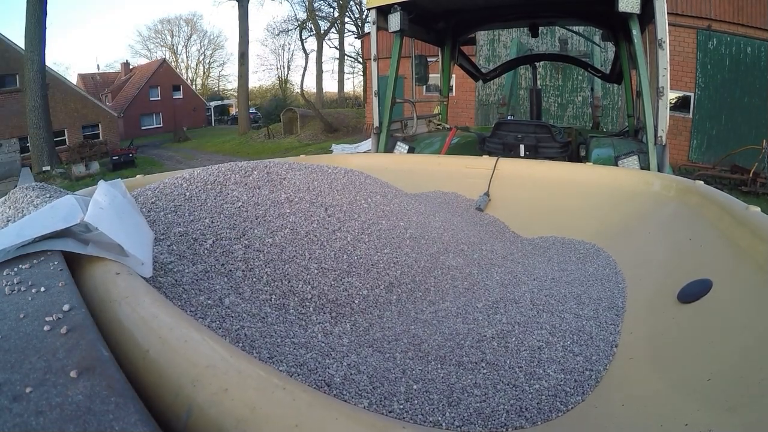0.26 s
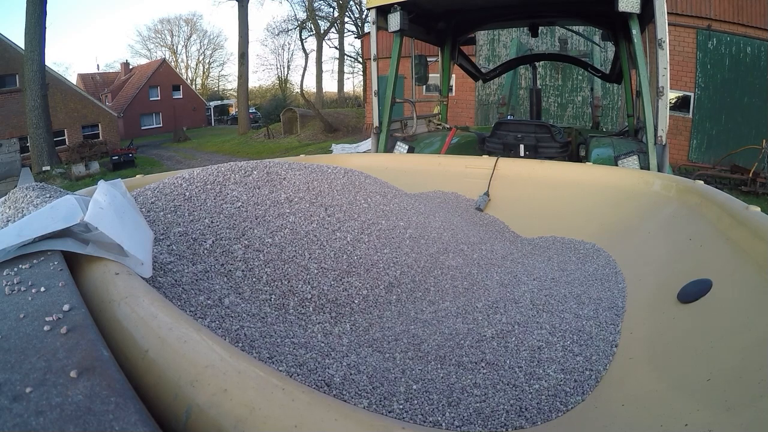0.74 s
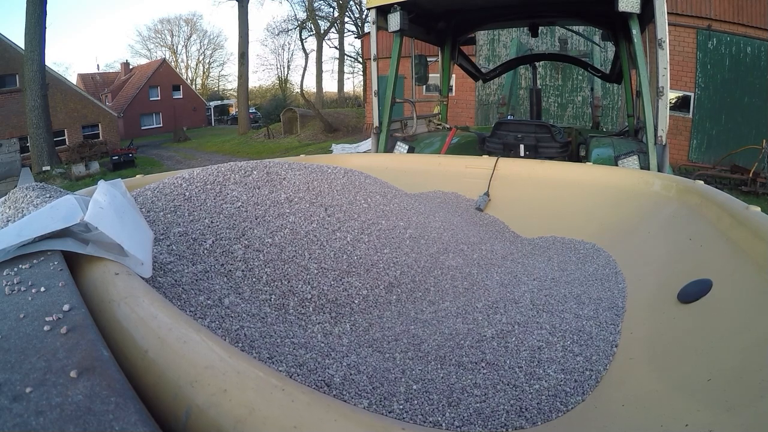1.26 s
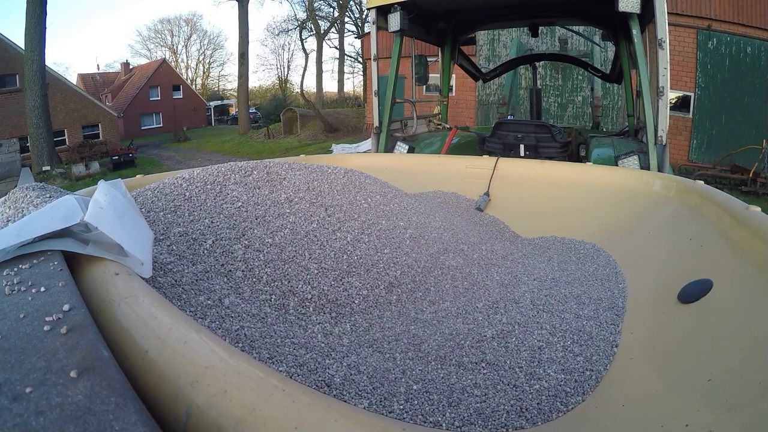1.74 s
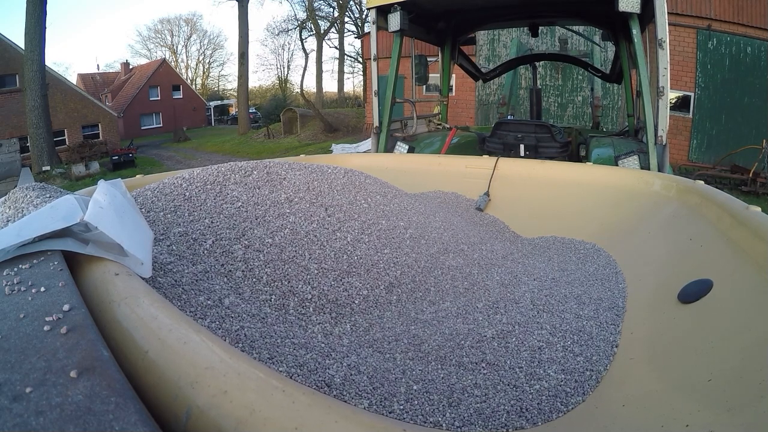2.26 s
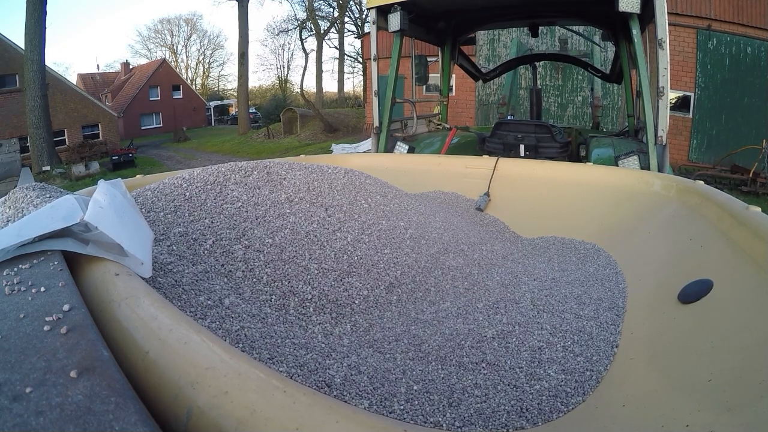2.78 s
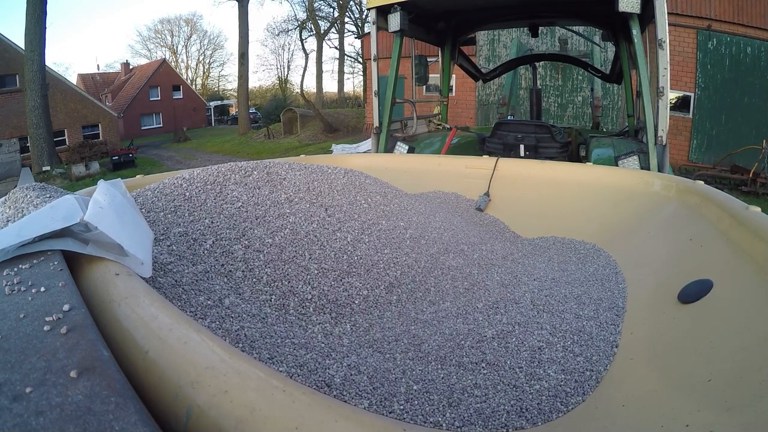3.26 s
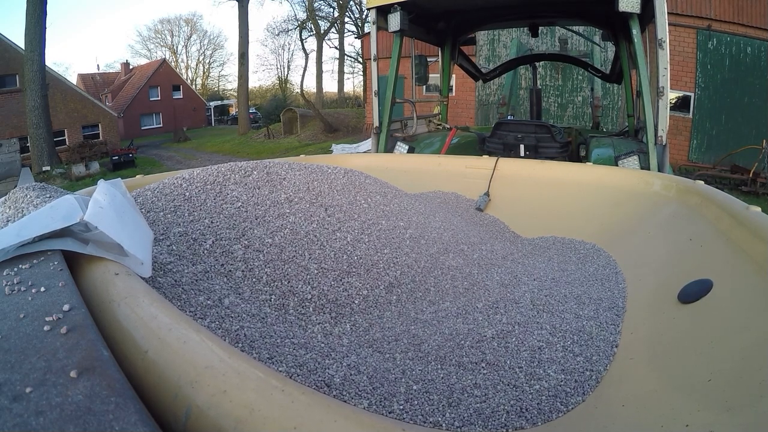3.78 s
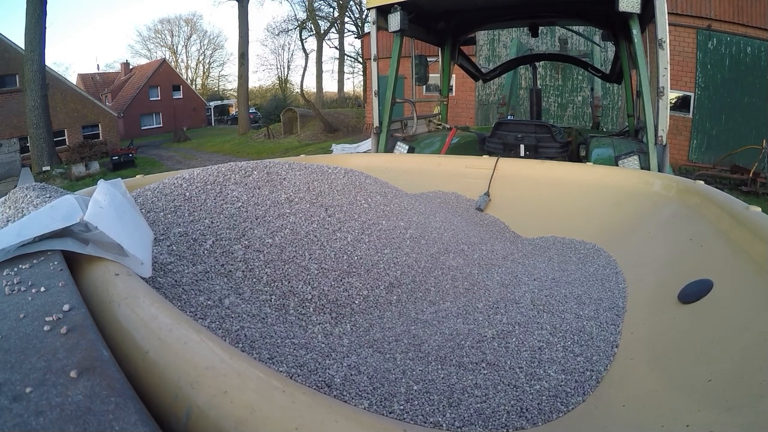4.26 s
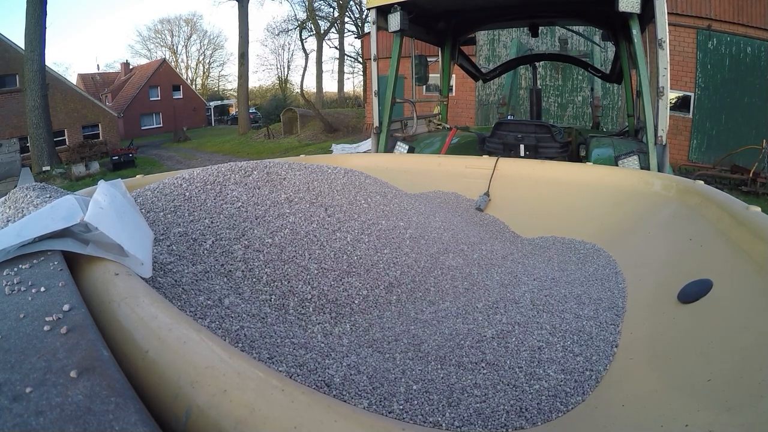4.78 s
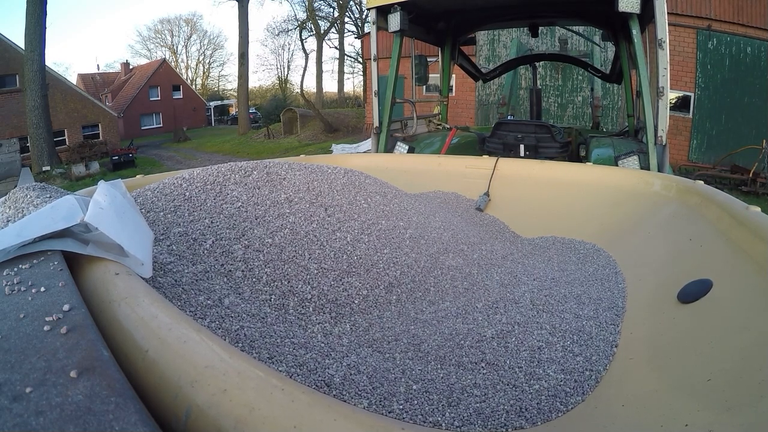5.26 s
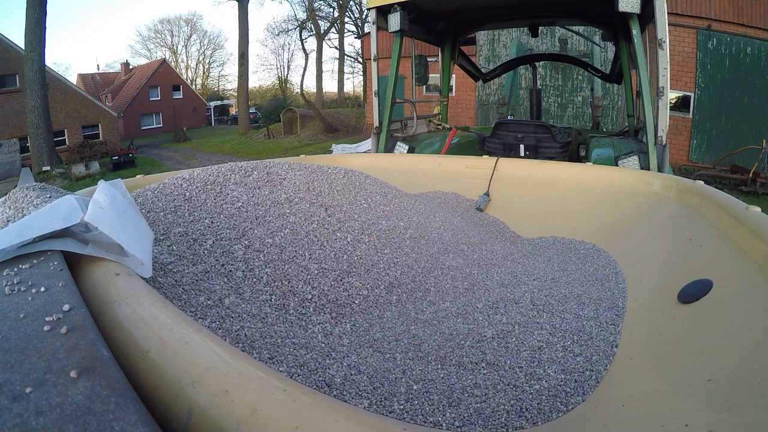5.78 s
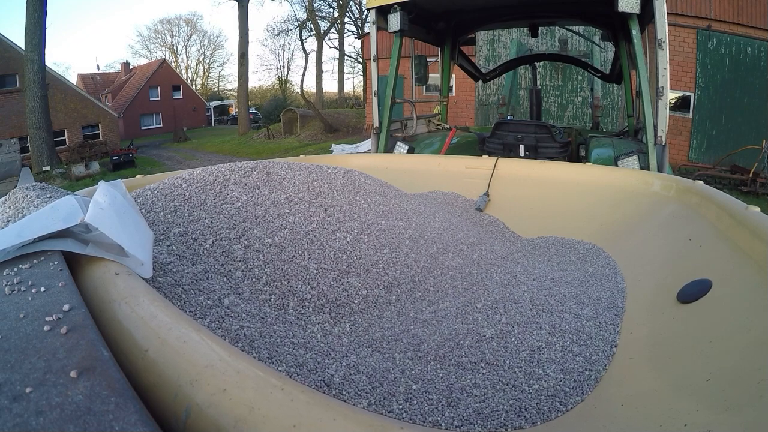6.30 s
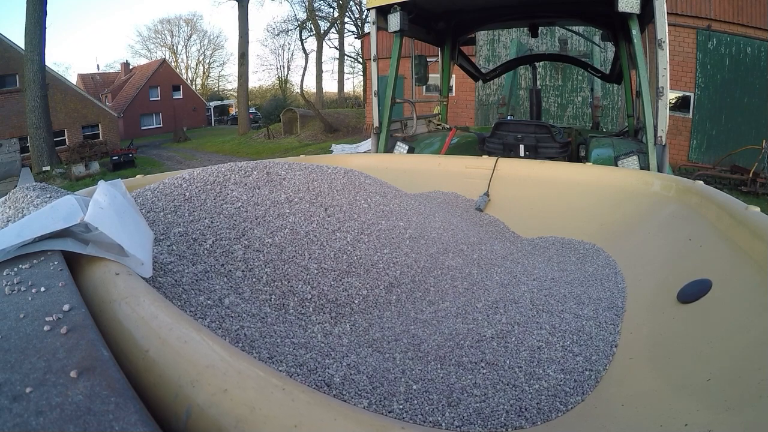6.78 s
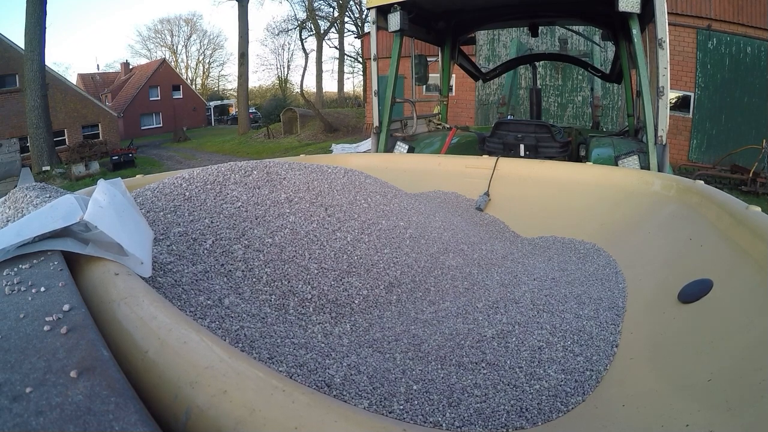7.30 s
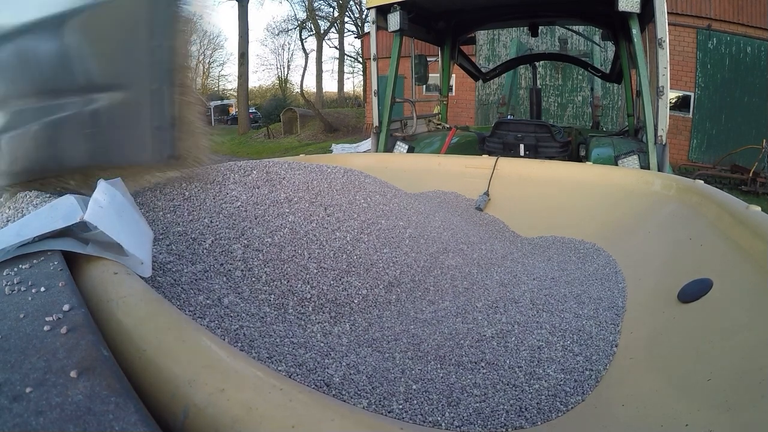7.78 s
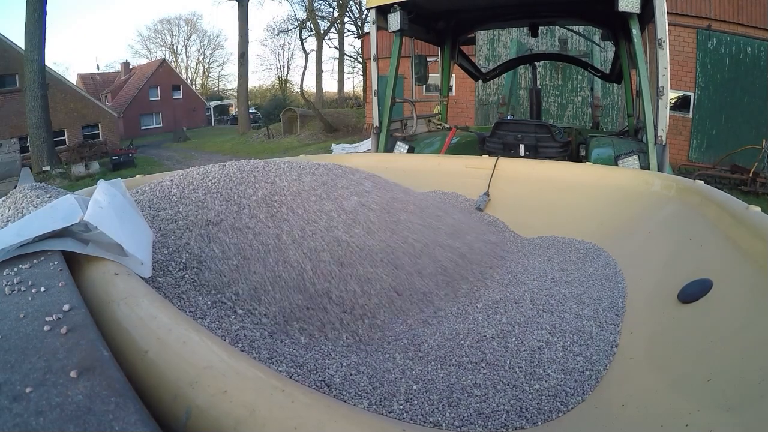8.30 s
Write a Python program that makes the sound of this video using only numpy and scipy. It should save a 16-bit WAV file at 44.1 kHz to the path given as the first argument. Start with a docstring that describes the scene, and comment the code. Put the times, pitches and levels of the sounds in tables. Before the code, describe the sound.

A steel shovel knocks, scrapes and crunches repeatedly into hard granules in a quiet farmyard, then a load is thrown hissing into a plastic hopper.

```python
"""A steel blade knocks on a farmyard floor, then scrapes and crunches into a heap of hard granules.
It rings when lifted free; dull low thuds fall, granules slide and tick, birds whistle, and at last a load
is thrown into a plastic hopper. Random contacts through filters and resonances make the granules and steel;
decaying sines make thumps, clacks and ticks; gliding sines make the birds; coloured noise makes the yard."""
import sys
import numpy as np
from scipy import signal
from scipy.fft import rfft, irfft
from scipy.io import wavfile

SR = 44100
rng = np.random.default_rng(int(sys.argv[2]) if len(sys.argv) > 2 else 0)


def transcribe(u):
    """Save the signal u as a 16-bit wav file named by the first command-line argument.

    u: samples, shape (n,) or (channels, n), limited to [-1, 1]; the rate is SR.
    q: integer samples, one column per channel.
    """
    v = np.clip(np.atleast_2d(u).T, -1, 1)
    q = np.round(v * 32767).astype(np.int16)
    wavfile.write(sys.argv[1], SR, q)


def amplitude_ratio(level_db):
    """Convert a level in decibels to the matching linear amplitude (field) ratio."""
    exponent = np.asarray(level_db, float) / 20
    return 10 ** exponent


N = 377010

# Colour of granules crushed under the edge. Each row: frequency in Hz, density in dB per Hz.
CRUSH_SPECTRUM = [(18, -106), (30, -1), (48, -5), (144, 0), (454, -8.5), (491, -6.5), (708, -7.5),
                  (969, -6.5), (1160, -7.5), (2680, -13.5), (3770, -18), (4890, -17.5), (15400, -38)]
# Broad resonances of the loaded blade. Each row: frequency in Hz, width in Hz, gain in dB.
LOADED_BLADE = [(55.5, 1.9, 16.5), (142.2, 32.4, 6.5), (229, 23.7, 2), (300.2, 16, 9), (420.3, 22.6, 4.5),
                (676, 28.5, 6.5), (777, 50, -10), (975.5, 38, 9.5), (1276, 135, -8), (1526, 80, 5),
                (1794, 220, -12.5), (2283, 127, 6), (2650, 96, -6), (2860, 53, 7), (3396, 125, -2.5),
                (4018, 65, 9), (4810, 52, -5), (5885, 85, 7.5), (7220, 39, 0)]


def shovel():
    """Granules crushed under the edge shake the loaded blade and the floor; the free blade rings on."""
    contacts = colour(granules(9000, spread_db=2.5, clumps_db=1.49), CRUSH_SPECTRUM)
    # alternating polarity of the modes
    rings = [(-1) ** k * amplitude_ratio(db) * resonance(contacts, hz, width_hz)
             for k, (hz, width_hz, db) in enumerate(LOADED_BLADE)]
    sound = strokes(contacts, rings) + knocks_and_thuds(contacts, rings) + slides() + clacks()
    return sound + free_blade(sound)


def strokes(contacts, rings):
    """Pushing through the heap excites crunch, hiss, rumble and the hollow of the filling scoop."""
    # the load shifts, so each resonance comes and goes
    body = sum(ring * drift(12, 4.0) for ring in rings)
    hollow = rms_one(resonance(contacts, hz=1000, width_hz=120))
    layers = [*three_bands(contacts + amplitude_ratio(-2) * body), hollow]
    pushed = np.sum(stroke_gains() * layers, axis=0)
    # the heap swallows some of the very top
    return signal.sosfilt(signal.butter(1, 12000, fs=SR, output="sos"), pushed)


# Pushes through the heap, one table a stroke, the last for the load being carried.
# Each row: time in seconds, crunch level in dB.
STROKES = [
    [(.128, -81), (.152, -35.5), (.248, -25), (.28, -23), (.326, -25), (.394, -22.5), (.47, -47.5),
     (.55, -52)],
    [(1.162, -58), (1.268, -50), (1.45, -28.5), (1.554, -18), (1.606, -23.5), (1.66, -21.5), (1.712, -26.5),
     (1.78, -59)],
    [(2.26, -66), (2.376, -47), (2.526, -35.5), (2.6, -33.5), (2.738, -18.5), (2.854, -16.5),
     (2.972, -25.5), (3.022, -50.5), (3.19, -52.5), (3.42, -47)],
    [(4.06, -57), (4.16, -47.5), (4.22, -56), (4.31, -65), (4.345, -19.5), (4.41, -15.5), (4.472, -10),
     (4.534, -23.5), (4.628, -48), (4.78, -55)],
    [(5.0, -70), (5.048, -35), (5.158, -16), (5.18, -28), (5.212, -12), (5.322, -27), (5.418, -55),
     (5.52, -60)],
    [(5.8, -55), (5.87, -35.5), (5.917, -18), (5.997, -18), (6.05, -20.5), (6.107, -25.5), (6.153, -40.5),
     (6.27, -57.5)],
    [(6.5, -58.5), (6.69, -52), (7.1, -57.5), (7.59, -58.5)],
]
# Colour of each stroke. Each row: granule hiss in dB, floor rumble in dB (both over the followed crunch),
# hiss fade in dB per second, hollow ring in dB over the crunch.
STROKE_COLOUR = [(-7.5, -14.5, 151, -11), (-9, -14.5, 155, -12), (-9, -11.5, 174, -11.5),
                 (-10.5, -9.5, 132, -19), (-7, -8, 183, -8), (-8, -8.5, 250, -1), (-7, -8, 150, -17)]
# The heap rustling between strokes. One row: crunch, hiss, rumble and hollow ring levels in dB.
REST = (-61, -66, -59, -75)
HISS_FOLLOWS, RUMBLE_FOLLOWS = 0.92, 0.88  # share of the crunch's swing in dB
RUMBLE_FADES_DB_PER_S, RUMBLE_LAG_S = 166, 0.016  # the floor takes the weight late and shakes on


def stroke_gains():
    """Crunch follows the push; hiss and rumble follow the crunch but fall at a limited rate."""
    t = np.arange(0, N, 16) / SR
    layers = np.repeat(np.array(REST, float)[:, None], len(t), axis=1)
    for rows, (hiss_db, rumble_db, hiss_fades, hollow_db) in zip(STROKES, STROKE_COLOUR):
        push, late = [np.interp(t - lag, *np.transpose(rows), -140, -140) for lag in (0, RUMBLE_LAG_S)]
        hiss = fall_slowly(hiss_db + HISS_FOLLOWS * push, hiss_fades, t)
        rumble = fall_slowly(rumble_db + RUMBLE_FOLLOWS * late, RUMBLE_FADES_DB_PER_S, t)
        layers = np.maximum(layers, [push, hiss, rumble, push + hollow_db])
    return np.array([np.interp(np.arange(N) / SR, t, amplitude_ratio(db)) for db in layers])


def fall_slowly(db, fade_db_per_s, t):
    """Follows rises at once, falls no faster than the fade."""
    return np.maximum.accumulate(db + fade_db_per_s * t) - fade_db_per_s * t


def knocks_and_thuds(contacts, rings):
    """A blow on the floor clatters mostly in the steel's resonances, with little top, and thumps."""
    struck = amplitude_ratio(-4) * contacts + sum(ring * drift(8, 2.0) for ring in rings)
    struck = signal.sosfilt(signal.butter(1, 7000, fs=SR, output="sos"), struck)
    envelopes, thumps = blows(rise_s=[.003, .002, .006], linger=[1.0, .9, 1.8], bend=1.19)
    return np.sum(envelopes * three_bands(struck), axis=0) + thumps


# Knocks of the blade. Each row: start in seconds, crunch in dB, hiss in dB, thump in dB,
# base decay in seconds per 60 dB.
KNOCKS = [(0.029, -37, -43, -52, 0.025), (.079, -18, -43, -18, .05), (.086, -15.5, -24, -13.5, 0.12),
          (0.16, -9.5, -16.5, -10, 0.067), (.243, -17.5, -30, -44, 0.11), (0.357, -23, -27, -48, 0.092),
          (0.615, -41.5, -73, -28.5, 0.062), (0.753, -35.5, -47, -22, 0.037),
          (0.96, -8.5, -22.5, -1.5, 0.088), (1.04, -34.5, -46, -20.5, 0.11),
          (1.145, -32.5, -71, -23.5, 0.11), (1.206, -23.5, -35, -19, 0.37),
          (1.269, -20.5, -24.5, -17, 0.036), (1.328, -24, -34.5, -12, 0.23), (1.355, -16, -41, -19, 0.022),
          (1.394, -17.5, -25, -45, 0.11), (1.652, -19, -37, -32, 0.092), (1.69, -19, -21, -3, 0.034),
          (2.207, -20, -33.5, -15, 0.12), (2.233, -35, -31, -27, 0.048), (2.314, -33, -39.5, -37, 0.21),
          (2.5, -29, -63, -35, 0.047), (2.546, -17.5, -27.5, -9.5, 0.056), (2.743, -32, -39, -40, 0.025),
          (2.848, -30.5, -44, -8, 0.22), (3.201, -44, -55, -65, 0.23), (3.391, -33.5, -39, -30, 0.034),
          (4.146, -23, -52, -39, .035), (4.219, -10, -29, -8.5, 0.075), (4.299, -29.5, -38.5, -22, 0.11),
          (4.347, -20, -31, -3.5, 0.13), (4.994, -2.5, -14, -0.5, 0.053), (5.08, -15.5, -24.5, -13, 0.28),
          (5.117, -16, -23, -31, 0.024), (5.17, -10.5, -23, -11, 0.079), (5.747, -11.5, -17.5, -16.5, .14),
          (5.806, -30.5, -44, -18, 0.11), (5.828, -15.5, -21.5, -32, 0.16), (6.09, -30.5, -56, -11, .1)]
# Dull low thuds: footsteps, and deep thumps during the strokes. Each row: start in seconds, thump in dB,
# settled thump pitch in Hz, base decay in seconds per 60 dB.
THUDS = [(0.695, -23, 254, 0.24), (1.358, -22, 131, .05), (2.249, -35, 255, .1), (2.318, -27, 247, 0.12),
         (3.153, -25, 76.7, .056), (4.429, -1.5, 140, 0.06), (5.118, 0.5, 146, 0.048),
         (6.829, -21, 60, 0.041), (6.925, -23, 44, 0.065), (7.263, -26.5, 106, 0.087),
         (7.291, -15.5, 134, 0.035), (7.39, -18, 69.7, 0.043)]
THUD_CRUNCH_DB, THUD_HISS_DB = -27, -40  # relative to the thump
THUMP_TOP_HZ, HARD_DB, PITCH_FOLLOWS = 284, -20, 0.536  # knocks softer than HARD_DB thump lower


def blows(rise_s, linger, bend):
    """Crunch, hiss and rumble envelopes of knocks and thuds, and the sagging low thump under each."""
    envelopes, thumps = np.zeros((3, N)), np.zeros(N)
    t = np.arange(SR // 3) / SR
    blade = [(*row, THUMP_TOP_HZ * amplitude_ratio(PITCH_FOLLOWS * min(row[1] - HARD_DB, 0))) for row in KNOCKS]
    thuds = [(s, db + THUD_CRUNCH_DB, db + THUD_HISS_DB, db, t60, hz) for s, db, hz, t60 in THUDS]
    for s, crunch_db, hiss_db, low_db, t60, hz in blade + thuds:
        at = slice(round(s * SR), round(s * SR) + len(t))
        levels_db = [crunch_db, hiss_db, low_db - 9.5]
        for layer, db, rise, longer in zip(envelopes, levels_db, rise_s, linger):
            # bend above 1: the sound holds for a moment before it dies
            decay = amplitude_ratio(db - 60 * (t / (t60 * longer)) ** bend)
            layer[at] += decay * (1 - np.exp(-t / rise))
        # a few cycles, sagging in pitch
        cycles = hz * t * (1 + 0.14 * np.exp(-t / 0.021))
        decay = amplitude_ratio(low_db - 60 * t / max(9.5 / hz, 0.64 * t60))
        thumps[at] += decay * np.sin(2 * np.pi * cycles) * (1 - np.exp(-t / 0.0089))
    return envelopes, thumps


# Colour of sliding granules. Each row: frequency in Hz, density in dB per Hz.
SLIDE_SPECTRUM = [(88, -14), (150, -8.5), (225, -3.5), (499, -12), (681, -2.5), (736, -6.5), (1510, -4.5),
                  (4050, -3), (15400, -22)]


def slides():
    """Granules sliding off the lifted blade: dense small contacts."""
    return slide_gain() * rms_one(colour(granules(12000, spread_db=3.0, clumps_db=0.4), SLIDE_SPECTRUM))


# Slides off the blade. Each row: start in seconds, rise in seconds, hold in seconds, fall in seconds,
# level in dB.
SLIDES = [(1.725, 0.038, 0.14, 0.1, -44.5), (3.376, 0.19, 0.13, .11, -36.5),
          (6.294, 0.074, 0.042, 0.077, -33.5)]
SLIDE_RISE_DB, SLIDE_FALL_DB, SLIDE_EDGE_S = 16, 22.5, 0.059


def slide_gain():
    """Each slide swells, holds and runs out."""
    tables = []
    for s, rise, hold, fall, db in SLIDES:
        full, falling, end = s + rise, s + rise + hold, s + rise + hold + fall
        tables.append([(s - SLIDE_EDGE_S, -80), (s, db - SLIDE_RISE_DB), (full, db), (falling, db),
                       (end, db - SLIDE_FALL_DB), (end + SLIDE_EDGE_S, -80)])
    return in_spans(tables)[0]


# The bare edge on stone. Each row: start in seconds, level in dB.
CLACKS = [(4.996, -27), (5.751, -11.5), (5.832, -26)]
# Modes of the edge. Each row: frequency in Hz, gain in dB, decay in seconds per 60 dB.
EDGE_MODES = [(3300, -7.5, .07), (3380, 7, 0.047), (4950, 1, 0.037), (5840, 1, .025)]


def clacks():
    """The bare edge clacks on stone in short bright modes."""
    out, t = np.zeros(N), np.arange(SR // 8) / SR
    for s, level_db in CLACKS:
        for hz, db, t60 in EDGE_MODES:
            decay = amplitude_ratio(level_db + db - 60 * t / t60)
            out[round(s * SR):][:len(t)] += decay * np.sin(2 * np.pi * hz * t) * (1 - np.exp(-t / .002))
    return out


# Blade modes, lowest first. Each row: frequency in Hz, gain in dB, decay in seconds per 60 dB.
BLADE_MODES = [(452, 0, .6), (689, -2, .4), (762, -2, .45), (921, -2, .3), (1040, -3, .2), (1165, -1, .27),
               (1550, -1, .2), (1669, 2, .35), (2200, -2, .2), (2290, -6, .3), (2710, -3, .23),
               (3250, -5, .22), (3920, -7, .22), (4255, -7, .2), (4750, -7, .22), (5460, -8, .17),
               (5795, -10, .17)]


def free_blade(sound):
    """Steel modes driven by all the shovel's sound, more strongly while the blade is free."""
    shaking, shaking_lowest = [sound * blade_freedom(lowest) for lowest in (False, True)]
    out = np.zeros(N)
    for k, (hz, db, t60) in enumerate(BLADE_MODES):
        drive = shaking_lowest if k == 0 else shaking
        out += amplitude_ratio(db) * resonance(drive, hz, width_hz=np.log(1000) / (np.pi * t60))
    return out


# Lifts of the blade. Each row: middle in seconds, length in seconds, gain in dB over the buried blade,
# extra gain in dB for the lowest mode.
LIFTS = [(.5, 1.3, 8, 9), (1.9, 2.8, 12, 9), (3.69, 0.46, 25, -16), (4.54, .8, 2.5, 7), (6.9, 1.7, 3, -10)]
BURIED_DB = -9


def blade_freedom(lowest):
    """Mode drive: damped in the heap, freer while lifted."""
    t = np.linspace(0, N / SR, num=500)
    db = BURIED_DB
    for s, length, lift_db, low_db in LIFTS:
        swell = np.cos(np.pi * np.clip((t - s) / length, -.5, .5)) ** 2
        db = db + (lift_db + lowest * low_db) * swell
    return np.interp(np.arange(N) / SR, t, amplitude_ratio(db))


# The thrown load and the start of a second fall, one table each.
# Each row: time in seconds, thud on the heap in dB, granule hiss in dB.
THROW = [
    [(7.59, -60, -76), (7.604, -31, -43.5), (7.74, -31, -38.5), (7.774, -30, -32), (7.91, -29.5, -25.5),
     (7.99, -35, -29.5), (8.034, -39, -39), (8.25, -41.5, -49.5), (8.432, -46.5, -50.5)],
    [(8.438, -37, -35), (8.452, -30, -23), (8.49, -31.5, -32.5), (8.549, -30, -30)],
]
# Colour of the falling load. Each row: frequency in Hz, density in dB per Hz.
LOAD_SPECTRUM = [(71, -39), (120, -12), (150, -3.5), (212, -10.5), (519, -5), (1060, -2), (2430, -4),
                 (5260, -5.5), (12400, -16), (15400, -18)]


def thrown_load():
    """Close by, the shower is bright up to the top; heavier granules patter on the heap and the plastic."""
    hiss_grains = colour(granules(16000, spread_db=2.5, clumps_db=.4), LOAD_SPECTRUM)
    patter = colour(granules(5000, spread_db=3.5, clumps_db=.8), LOAD_SPECTRUM)
    thud, hiss = in_spans(THROW)
    return thud * band(patter, 175, HIGH_HZ) + hiss * band(hiss_grains + patter, HIGH_HZ)


# Loudest stray granules landing on the plastic. Each row: start in seconds, level in dB, pitch in Hz.
TICKS = [(.819, -47, 2730), (.8592, -44.5, 2420), (2.1418, -42.5, 4300), (3.8035, -35.5, 4970),
         (3.978, -48.5, 5080), (6.906, -43, 4700), (7.0735, -44, 2800), (7.5983, -47, 2330),
         (7.7088, -25.5, 2450), (8.283, -36.5, 2590), (8.3205, -36, 2900), (8.341, -43, 3000),
         (8.371, -41, 3180), (8.3838, -36, 2500), (8.4094, -45, 3070)]


def ticks():
    """Each stray granule gives a click: a decaying sine plus resonant noise."""
    out = np.zeros(N)
    t = np.arange(400) / SR
    for s, db, hz in TICKS:
        noise = resonance(rng.standard_normal(len(t)), 0.83 * hz, width_hz=2300)
        click = np.sin(2 * np.pi * hz * t) + 6.3 * noise
        out[round(s * SR):][:len(t)] += amplitude_ratio(db - 60 * t / 0.0092) * click
    return signal.sosfilt(signal.butter(2, 7000, fs=SR, output="sos"), out)


# Loose granules trickling down the heap. Each row: time in seconds, level in dB.
TRICKLE = [(0, -83), (.8, -68), (1.0, -85), (4.8, -66), (5.6, -94), (6.8, -71), (7.5, -59.5), (8.0, -71),
           (8.55, -46)]


def trickle():
    """Fainter clicks fall at random, each dealt one of eight pitches."""
    clicks = granules(220, spread_db=3.0, clumps_db=4.0)
    pitches_hz, dealt = np.geomspace(1500, 7000, 8), rng.integers(0, 8, N)
    faint = sum(resonance(clicks * (dealt == k), hz, 0.39 * hz) for k, hz in enumerate(pitches_hz))
    return amplitude_ratio(in_time(TRICKLE)[0]) * rms_one(faint)


# Bird notes. Each row: start in seconds, length in seconds, top of the glide in Hz, level in dB,
# fade over the note in dB (negative swells).
BIRD = [(6.67, .175, 3370, -58.5, -1.5), (6.99, .13, 3330, -54.5, 6), (7.315, .15, 3270, -57, 2)]
# Chirps of a second bird. Each row: start in seconds, length in seconds, first pitch in Hz,
# last pitch in Hz, level in dB.
CHIRPS = [(3.916, 0.061, 4300, 3000, -62), (4.058, .03, 3250, 3800, -57), (4.097, 0.042, 3900, 3100, -56),
          (6.99, 0.037, 4350, 3630, -61)]
NOTE_START_HZ, NOTE_RISE_S, DROOP_HZ_PER_S = 2280, .14, 3500


def birds():
    """Near-pure glides with soft ends, far off, so with much echo."""
    notes = []
    for s, length, top_hz, db, fades_db in BIRD:
        t = np.arange(round(length * SR)) / SR
        rising = NOTE_START_HZ + (top_hz - NOTE_START_HZ) * t / NOTE_RISE_S
        drooping = top_hz - DROOP_HZ_PER_S * (t - NOTE_RISE_S)
        notes.append((s, np.minimum(rising, drooping), db - fades_db * t / length, .2))
    for s, length, from_hz, to_hz, db in CHIRPS:
        notes.append((s, np.linspace(from_hz, to_hz, round(length * SR)), db, .6))
    out = np.zeros(N)
    for s, hz, db, soft_share in notes:
        gain = np.sqrt(2) * amplitude_ratio(db) * signal.windows.tukey(len(hz), soft_share)
        out[round(s * SR):][:len(hz)] += gain * np.sin(2 * np.pi * np.cumsum(hz) / SR)
    out *= drift(40, 2.2)
    return out + amplitude_ratio(-6) * walls(out, t60=.8)


# Colour of the yard. Each row: frequency in Hz, density in dB per Hz.
YARD_SPECTRUM = [(15, -45), (25, 9), (64, 10), (368, -22.5), (432, -13.5), (508, -17), (760, -18),
                 (2760, -22.5), (4860, -23), (7280, -34), (14300, -32), (15400, -51)]
YARD_DB = -50.5


def yard():
    """Far smooth hiss of the yard over a lumpy low rumble."""
    air = rms_one(colour(rng.standard_normal(N), YARD_SPECTRUM))
    rumble = signal.sosfilt(signal.butter(2, 200, fs=SR, output="sos"), air)
    return amplitude_ratio(YARD_DB) * ((air - rumble) * drift(3, .6) + rumble * drift(4, 3.5))


def walls(x, t60):
    """Dull scattered echoes from the farm buildings: decaying lowpassed noise after 12 ms."""
    t = np.arange(SR // 2) / SR
    tail = rng.standard_normal(len(t)) * amplitude_ratio(-60 * t / t60) * (t > .012)
    tail = signal.lfilter([.4], [1, -.6], tail)
    return signal.fftconvolve(x, tail / np.sqrt(np.sum(tail ** 2)))[:N]


def granules(per_s, spread_db, clumps_db):
    """Random contacts of uneven size that come in clumps, rms 1."""
    sizes = amplitude_ratio(spread_db * np.minimum(rng.exponential(1, N), 5)) * rng.choice([-1, 1], N)
    return rms_one(sizes * (rng.random(N) < per_s / SR) * drift(21.4, clumps_db))


def drift(rate_hz, spread_db):
    """Gain that wanders slowly by chance, drawn at every 16th sample."""
    r = np.exp(-32 * np.pi * rate_hz / SR)
    slow = signal.lfilter([1], [1, -2 * r, r * r], rng.standard_normal(N // 16 + 3002))[3000:]
    return np.interp(np.arange(N) / 16, np.arange(len(slow)), amplitude_ratio(spread_db * rms_one(slow)))


def resonance(x, hz, width_hz):
    """Two-pole resonance, gain 1 on top."""
    r = np.exp(-np.pi * width_hz / SR)
    poles = [1, -2 * r * np.cos(2 * np.pi * hz / SR), r * r]
    return signal.lfilter([(1 - r * r) / 2, 0, (r * r - 1) / 2], poles, x + 1e-18)


def colour(x, spectrum, size=4096):
    """Causal filter with the given spectrum (minimum phase from the folded cepstrum)."""
    hz, db = np.transpose(spectrum)
    grid_hz = np.maximum(np.arange(size // 2 + 1), .5) * SR / size
    cepstrum = irfft(np.interp(np.log(grid_hz), np.log(hz), db) * np.log(10) / 20)
    cepstrum[1:size // 2] *= 2
    cepstrum[size // 2 + 1:] = 0
    return signal.fftconvolve(x, irfft(np.exp(rfft(cepstrum))))[:N]


LOW_HZ, HIGH_HZ = 350, 2500


def three_bands(x):
    """Crunch, hiss and rumble parts, rms 1 each."""
    return np.array([band(x, LOW_HZ, HIGH_HZ), band(x, HIGH_HZ), band(x, high_hz=LOW_HZ)])


def band(x, low_hz=None, high_hz=None):
    """Butterworth edges, rms 1."""
    if low_hz:
        x = signal.sosfilt(signal.butter(3, low_hz, "high", fs=SR, output="sos"), x)
    if high_hz:
        x = signal.sosfilt(signal.butter(3, high_hz, "low", fs=SR, output="sos"), x)
    return rms_one(x)


def rms_one(x):
    """Scales to rms 1."""
    return x / np.sqrt(np.mean(x ** 2) + 1e-20)


def in_time(rows, outside=None):
    """Interpolates each column of a table over time in seconds."""
    s, *columns = np.transpose(rows)
    return [np.interp(np.arange(N) / SR, s, c, outside, outside) for c in columns]


def in_spans(tables):
    """Gains from several dB tables, silent outside them."""
    return amplitude_ratio(np.max([in_time(rows, outside=-140) for rows in tables], axis=0))


def scene():
    """Near sources with short echoes, over the birds and the yard; one channel."""
    near = shovel() + thrown_load() + ticks() + trickle()
    return (near + amplitude_ratio(-19) * walls(near, t60=0.14) + birds() + yard())[None]


def band_limit(x):
    """A steep low-pass at the top of the band."""
    return signal.sosfilt(signal.butter(12, 15600, fs=SR, output="sos"), x)


def record(dry):
    """The loudest peaks are rounded."""
    mix = 1.184 * np.tanh(dry / 1.173)
    return band_limit(mix)


dry = scene()
out = record(dry)
transcribe(out)
```